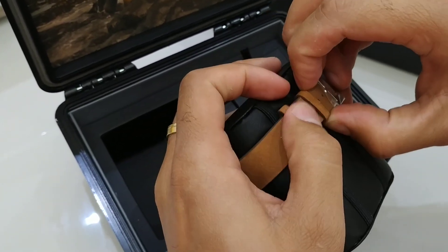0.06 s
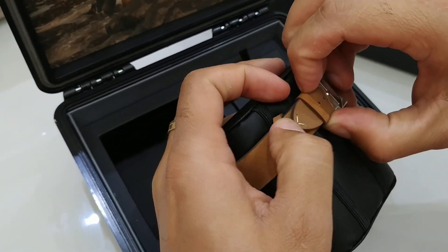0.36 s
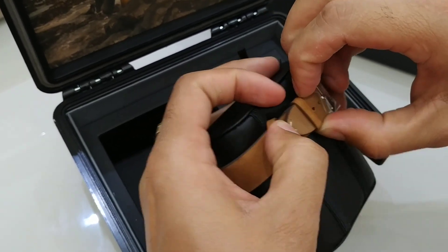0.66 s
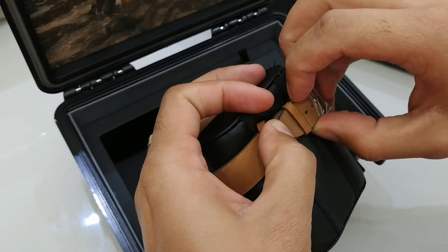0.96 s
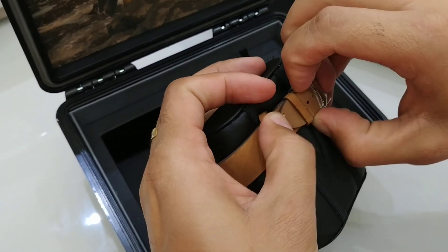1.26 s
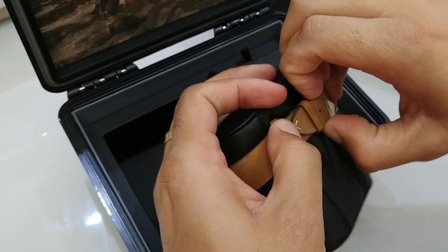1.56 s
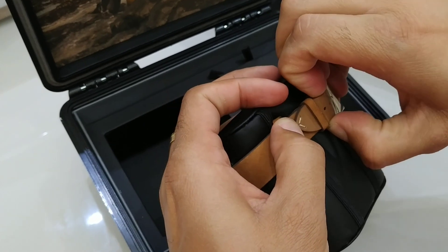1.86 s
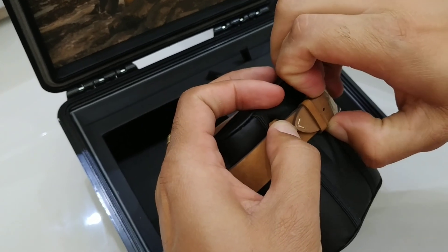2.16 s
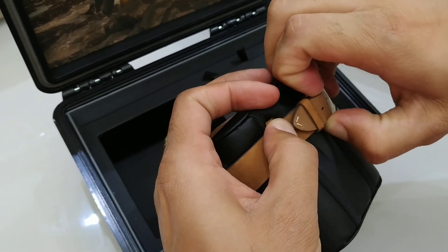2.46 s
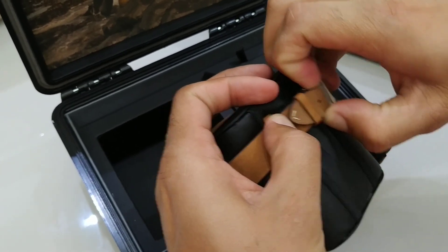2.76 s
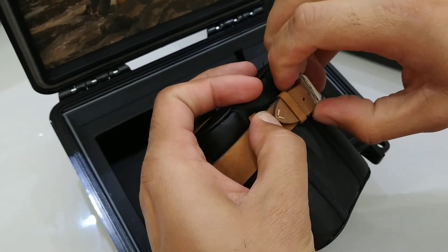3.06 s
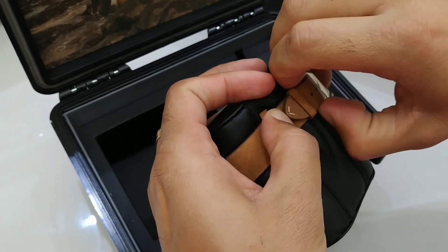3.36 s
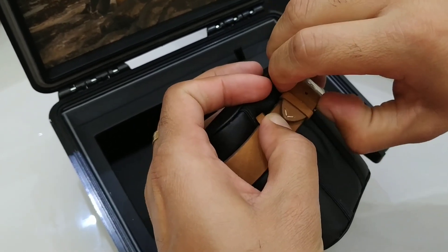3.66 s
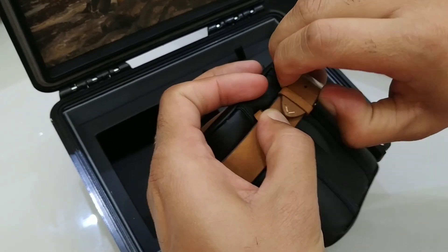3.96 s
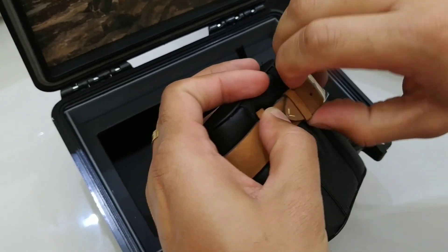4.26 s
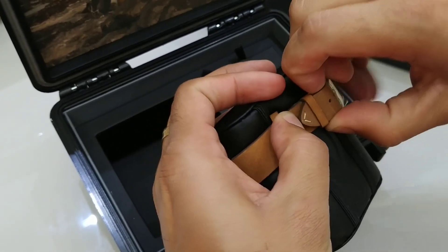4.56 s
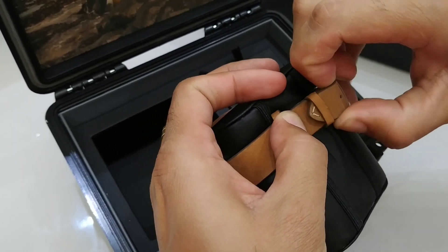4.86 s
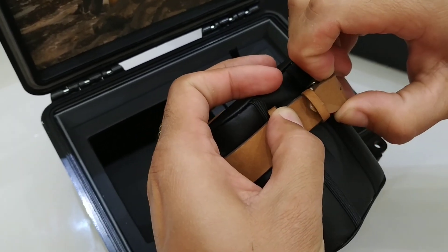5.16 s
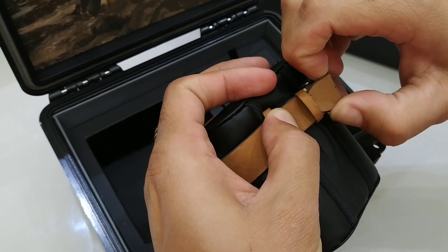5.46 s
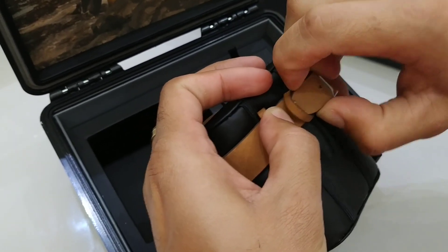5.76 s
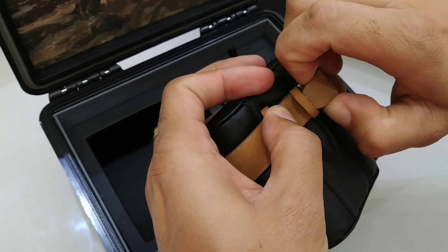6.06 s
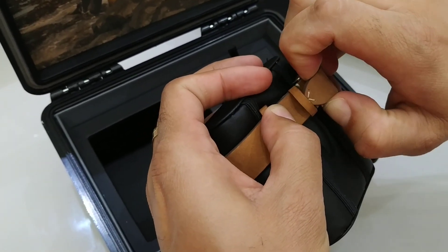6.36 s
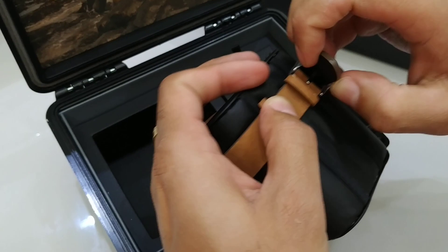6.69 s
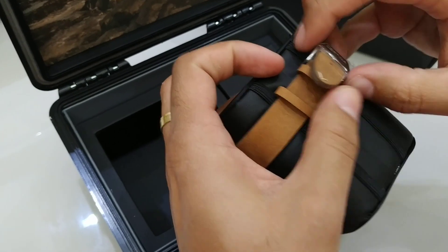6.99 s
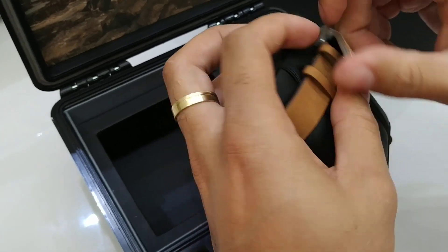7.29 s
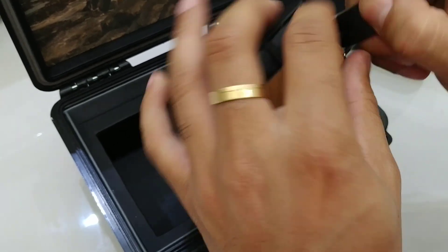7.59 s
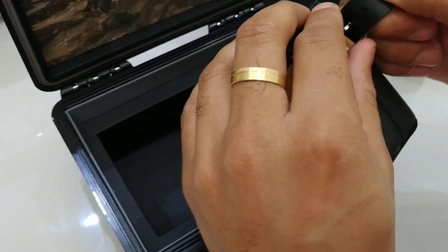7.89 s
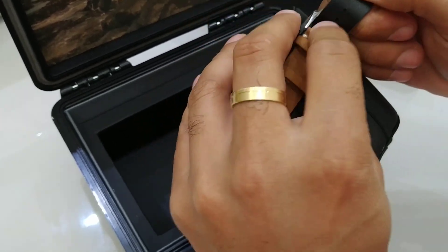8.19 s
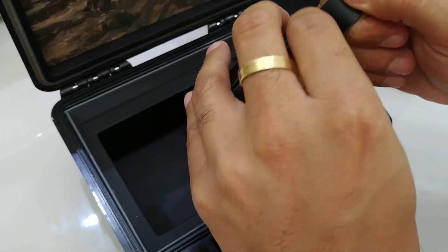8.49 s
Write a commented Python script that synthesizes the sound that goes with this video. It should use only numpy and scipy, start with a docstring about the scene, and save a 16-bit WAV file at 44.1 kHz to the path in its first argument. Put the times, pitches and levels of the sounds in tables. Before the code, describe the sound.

A steel buckle clicks as fingers work a leather watch strap loose, then the watch cushion creaks sharply over a low fan hum.

```python
"""A steel buckle clicks as fingers work a leather watch strap out of it, close by, over an open plastic
case. The watch on its cushion is then pushed about: the cushion sticks and slips, in sharp creaks that
run together into a short zip. Each click, creak or knock is a tiny push that makes a part ring briefly.
Rubbing skin and leather add a rustle made of noise. A fan hums, and the small room echoes a little."""
import sys
import numpy as np
from scipy import signal
from scipy.fft import rfft, irfft, next_fast_len
from scipy.io import wavfile

SR = 44100
rng = np.random.default_rng(int(sys.argv[2]) if len(sys.argv) > 2 else 0)


def log_audio(samples):
    """Write samples as a 16-bit WAV file to the path given in sys.argv[1]."""
    # one column per channel
    frames = np.atleast_2d(samples).T
    # limit to full scale, then quantise
    limited = np.clip(frames, -1, 1)
    pcm = np.round(limited * 32767).astype(np.int16)
    wavfile.write(sys.argv[1], SR, pcm)


N = 376411
TIME = np.arange(N) / SR

# Rumble and hiss of moving air: (frequency [Hz], relative level [dB])
AIR_SPECTRUM = [(8, -3), (18, 4.5), (30, -7.5), (48, -9), (72, -29), (105, -17), (140, -23), (195, -10.5),
                (250, -22), (280, -17.5), (370, -35), (700, -34), (1700, -54), (3000, -50), (5300, -48.5),
                (10000, -51.5), (16000, -48.5)]
# How much the air differs between left and right: (frequency [Hz], gain of the difference [dB])
AIR_WIDTH = [(30, -18.5), (70, -7.5), (200, -18), (400, -20), (1200, 4.5), (8000, 0.5)]
# Tones of the fan motor: (frequency [Hz], relative level [dB])
HUM_TONES = [(118.4, -80.5), (177.6, -63.5), (236.9, -67)]
# The room's echo: (frequency [Hz], gain [dB], fade time [s]). A fade time is how long a 60 dB drop takes.
ROOM_ECHO = [(196, -8.5, 0.26), (553, -2, 0.5), (1100, -10, 0.28), (2190, -3.5, 0.24), (3380, -4, 0.24),
             (5400, -7, 0.35), (10000, -6.5, 0.26), (14500, -3, 0.16)]
# Faint thin whistles and squeaks: (start [s], length [s], pitch [Hz], width [Hz], level [dB])
FAINT_WHISTLES = [(1.796, .08, 1600, 600, -69.5), (2.77, .04, 1450, 450, -62.5),
                  (2.75, 0.37, 2700, 220, -79), (3.171, 0.44, 2720, 130, -76.5),
                  (3.576, 0.043, 1340, 600, -66), (5.047, .19, 2360, 120, -68),
                  (6.568, .15, 2780, 600, -66)]
# Sliding leather: (frequency [Hz], relative level [dB])
LEATHER_SPECTRUM = [(1500, -1.5), (3000, 1), (4200, 3), (5600, 4), (8500, -1), (11000, -5.5), (15000, -8.5),
                    (17000, -9)]
# Brushing skin: (frequency [Hz], relative level [dB])
SKIN_SPECTRUM = [(150, -2.5), (400, 3.5), (800, -4), (1500, -3), (2300, -4), (3200, -12), (6000, -18)]
# Finger movements: (start [s], length [s], leather level [dB], skin level [dB])
FINGER_STROKES = [(0.64, 0.17, -59.5, -71), (0.877, 0.061, -60, -58.5), (1.26, 0.26, -68, -64),
                  (2.781, 0.18, -57, -63.5), (3.99, 0.074, -59.5, -70), (4.316, 0.15, -86, -86),
                  (4.706, 0.081, -59, -78), (5.572, 0.11, -62, -67), (6.504, 0.434, -55, -63),
                  (6.958, 0.34, -61.5, -78), (7.326, 0.25, -51, -61.5), (7.662, 0.073, -55, -58),
                  (7.777, 0.64, -57, -59.5)]
# Hand, strap and cushion knock on the case. The last three levels are relative to the knock:
# (time [s], level [dB], pitch [Hz], lower wall ring [dB], thump [dB], crack [dB])
CASE_KNOCKS = [(0.6914, -37.5, 1950, 0.5, -26, -11), (.936, -36, 1350, -2.5, -6.5, -20),
               (4.9191, -43.5, 1370, 2, -2, 0), (6.4408, -34, 1720, 7, 5, 5),
               (6.703, -40, 2047, -2.5, -34, -18), (7.363, -38.5, 2300, -12.5, -13, 2.5),
               (8.2731, -28, 1550, -23, -20, -4), (8.5074, -48, 1530, -9, 2.5, -1)]
# Low tones of the whole case: (frequency [Hz], relative level [dB], fade time [s])
CASE_TONES = [(191, 8.5, 0.1), (265, 15, 0.041), (342, 10, 0.024)]
# Tones of the buckle and watch steel: (frequency [Hz], relative level [dB], fade time [s])
STEEL_TONES = [(4877, -4, .15), (8237, 0, .17), (8309, -2, .17), (8495, 0, .19), (8738, -3, .15),
               (10160, -3, .18), (9067, -4, .14), (10220, -3, .2), (11420, -5, .19), (12420, -7, .2),
               (12980, -5, .17), (13965, -3, .18), (15220, -6, .19), (15660, -3, .19)]
# The strap jerks through its loop and over the cushion: (time [s], level [dB])
STRAP_JERKS = [(5.9048, -28), (5.9156, -34), (5.931, -33.5), (5.948, -36), (5.985, -38), (6.0114, -42),
               (7.8092, -29.5), (7.8571, -23)]
# Where tight leather rings: (frequency [Hz], width [Hz], relative level [dB])
LEATHER_BANDS = [(5650, 900, -3), (7050, 900, 0), (8500, 1300, 0.5), (13200, 1200, -19), (14900, 1100, -10)]
# Single slips of the cushion: (time [s], level [dB])
CUSHION_SLIPS = [(7.89, -17.5), (7.9335, -18), (7.988, -17), (8.021, -19), (8.262, -19), (8.2704, -17.5)]
# The slips run together: (time [s], rate [slips/s], level [dB])
CUSHION_ZIP = [(8.2741, 244, -19.5), (8.288, 246, -25.5), (8.301, 286, -23.5), (8.312, 470, -31.5),
               (8.326, 540, -30.5), (8.347, 460, -52)]
# Where a slip rings: (frequency [Hz], width [Hz], relative level [dB])
CUSHION_BANDS = [(2300, 700, -18), (4600, 1100, -7), (6000, 1700, -7), (8450, 1400, 3.5), (10100, 900, 0.5),
                 (11400, 1400, -4), (13800, 1500, 3), (15250, 1300, 2)]
# Clicks of the buckle, its tongue and the watch: (time [s], level [dB], snap pitch [Hz],
# hollow over snap [dB], bright edge over snap [dB], left over right [dB], chatter over first push [dB])
BUCKLE_CLICKS = [(0.1557,-43,5570,-4.5,-23,10,-6), (0.6919,-40,5740,-1.5,-7,-1,8),
                 (0.8271,-42.5,6100,-9,-8,8,15), (.841,-43,6000,-9,-4,12,3),
                 (0.8598,-42,5740,-12.5,-5,14,2), (0.894,-36.5,5400,-15,-7,9,7),
                 (0.913,-40,5940,-5,-10,11,4), (0.936,-49,5900,-5,-7,5,-1),
                 (1.0156,-39.5,5070,-12,-9.5,6,-5), (1.782,-50.5,6200,-10,1.5,3,12),
                 (2.282,-62.5,4940,8.5,-18,1,10), (2.4215,-43,5490,-22,-27,8,-14),
                 (2.628,-62,5550,-7,-11,-1,2), (2.769,-57,5900,-8,-8,5,6), (2.8418,-42,6500,-2.5,-3,7,11),
                 (2.8712,-35,6150,-20,-12,4,10), (3.065,-55.5,6000,-23,-13,3,-4.5),
                 (3.146,-57.5,5800,-21,-2,4,0), (3.4084,-46,5260,-15.5,2.5,4,20),
                 (4.0019,-38,5140,-4.5,-5,6,6), (4.101,-51,6700,-23,10,10,0),
                 (4.109,-52,6000,-2.5,-7.5,13,3), (4.327,-59,7500,-22,-1,3,6),
                 (4.3335,-40,7360,-32,-8,3.5,8), (4.398,-56,5750,-23,6.5,2,9),
                 (4.4373,-50.5,5070,-16,-14,11,0), (4.481,-65.5,6000,-18,8,1,2),
                 (4.59,-47,5300,-3.5,-18.5,10,-5), (4.6269,-41,6000,-13.5,-22,3,17),
                 (4.69,-39.5,4840,-22,-21,4,-7), (4.9037,-28.5,5260,-23,2.5,4,4),
                 (5.278,-49.5,4840,-22,-24,9,-5), (5.6601,-44,5200,-11,-14,13,-1),
                 (5.6964,-53,6810,-23,-13,3,2), (6.2391,-47,8000,-21,-9,4,5), (6.44,-27,5650,-8,2,3,12),
                 (6.685,-45.5,6340,-3,-15,9,4), (6.703,-35.5,7260,-8,-5,3,9),
                 (6.8401,-35.5,5000,-11,-13,5,1), (6.847,-33,6460,-7,-25,2,-6),
                 (6.864,-38.5,6650,-16,-5,1,8), (7.0346,-33.5,6570,-14,-13,2,5),
                 (7.047,-36.5,5100,-19,-25,1,-14), (7.0665,-38.5,7100,-25,-12,16.5,-3),
                 (7.0683,-41.5,6700,-18.5,-8,-3,-3), (7.1583,-42,7100,-29,-12,6,0),
                 (7.1958,-53,5460,-20,3,1,3), (7.3081,-47,7900,-25,0,4,5), (7.3198,-30.5,8200,-27,-3.5,4,4),
                 (7.3624,-35,7200,-10.5,4,1,16), (7.427,-49,6370,-6,-12,-5,-8),
                 (7.477,-50.5,4730,-13,-3,8,-2), (7.4894,-41.5,5570,-3,0,-2,18),
                 (7.755,-50.5,6260,-19.5,-13,4,5.5), (8.379,-45,8030,-9,-10,5,3),
                 (8.506,-19.5,7150,-37,-6,7.5,-9)]


def gain(db):
    """Turn decibels into a number to multiply by."""
    return 10 ** (np.asarray(db) / 20)


def unit(x):
    """Scale a sound so its average strength (rms) is 1."""
    return x / np.sqrt(np.mean(x ** 2))


def unit_hit(x):
    """Scale a short sound so its first 4 ms have an average strength of 1."""
    return x / np.sqrt(np.mean(x[..., :176] ** 2))


def add(track, start, x):
    """Mix a short sound into the track at a start time in seconds."""
    i = int(start * SR)
    track[:, i:i + x.shape[-1]] += x[..., :max(N - i, 0)]


def place(pan_db, room_db):
    """Gains for three rows: left, right and the feed to the room. Positive pan is to the left."""
    return gain(np.array([[pan_db / 2], [-pan_db / 2], [room_db]]))


def band(x, hz, width_hz, order=1):
    """Keep the frequencies around hz, as a ringing part does."""
    low = np.hypot(hz, width_hz / 2) - width_hz / 2
    high = min(low + width_hz, SR / 2 - 100)
    return signal.lfilter(*signal.butter(order, [low, high], "band", fs=SR), x)


def colour(x, spectrum):
    """Make each frequency louder or softer, following a spectrum table."""
    hz, db = np.transpose(spectrum)
    size = next_fast_len(N)
    log_hz = np.log(np.fft.rfftfreq(size, 1 / SR) + 1)
    curve = gain(np.interp(log_hz, np.log(hz), db))
    return irfft(rfft(x, size) * curve, size)[..., :N]


def ring(tones, t):
    """The fading pure tones of something struck."""
    return sum(gain(db) * np.sin(2 * np.pi * hz * t) * gain(-60 * t / fade_s)
               for hz, db, fade_s in tones)


def resonate(force, bands, tilt_db):
    """A push rings several bands, every other one flipped; tilt_db is the boost per octave."""
    return unit_hit(sum(
        (-1) ** k * gain(db) * (hz / 1000) ** (tilt_db / 6) * band(force, hz, width, order=2)
        for k, (hz, width, db) in enumerate(bands)))


def wander(per_s):
    """A random curve, roughly 1 in size, that heads for a new value per_s times a second."""
    return np.interp(TIME * per_s, np.arange(2048), rng.standard_normal(2048))


def stereo_noise(length, apart):
    """Left and right noise: alike when apart is 0, unrelated when it is 1."""
    noise = rng.standard_normal((3, length))
    return np.sqrt(1 - apart) * noise[0] + np.sqrt(apart) * noise[1:]


def contact(chatter_db, fade_s, apart):
    """One sharp push. Left and right also get brief chatter inside the case; the room feed does not."""
    t = TIME[:1024]
    force = stereo_noise(len(t), apart) * gain(-60 * t / fade_s)
    force *= gain(chatter_db) / np.sqrt(np.sum(force ** 2, axis=1, keepdims=True))
    force[:, 0] += 1
    clean_push = (t == 0) * np.hypot(1, gain(chatter_db))
    return np.vstack([force, clean_push])


def stroke(start, length, rise_s=0.028, fall_s=0.049):
    """A strength curve that rises, holds and dies away."""
    rise = np.clip((TIME - start) / rise_s, 0, 1)
    return rise * np.exp(-np.clip((TIME - start - length) / fall_s, 0, 30))


def around_clicks(spread_s):
    """A curve that swells before each buckle click and fades after it."""
    return sum(np.exp(-np.minimum(np.abs(TIME - start) / spread_s, 20)) for start, *_ in BUCKLE_CLICKS)


def fan():
    """Rumbling air and a wavering motor hum; the bass is alike on both sides, the hiss is not."""
    middle, side = colour(rng.standard_normal((2, N)), AIR_SPECTRUM)
    side = colour(side, AIR_WIDTH)
    air = np.array([middle + side, middle - side]) / np.std(middle)
    hum = 0
    for hz, db in HUM_TONES:
        strength = gain(db + 0.81 * wander(7.4))
        hum += strength * unit(np.sin(2 * np.pi * hz * TIME + .5 * wander(2.12)))
    return (gain(-49) * air + gain(-0.5) * hum) * gain([[-.4], [.4]])


def room(x, build_s=0.00057):
    """The walls blur a sound into a short echo that builds fast and lasts longest in the low middle."""
    t = TIME[:SR // 2]
    hz, db, fade_times = np.transpose(ROOM_ECHO)
    noise = rfft(rng.standard_normal((2, len(t))))
    log_hz = np.log(np.fft.rfftfreq(len(t), 1 / SR) + 1)
    echo = 0
    for one_band, strength, fade_s in zip(np.eye(len(hz)), gain(db), fade_times):
        shape = gain(-60 * t / fade_s) * (1 - np.exp(-t / build_s))
        band_noise = irfft(noise * np.interp(log_hz, np.log(hz), one_band), len(t))
        echo += strength * band_noise * shape / np.sqrt(np.sum(shape ** 2))
    return signal.oaconvolve(x, echo, axes=1)[:, :N]


def faint_whistles():
    """Faint thin whistles and squeaks, each wavering noise in one narrow band."""
    noise = stereo_noise(N, apart=.4) * gain(2 * wander(25))
    return sum(gain(db) * unit(band(noise, hz, width, order=2)) * stroke(start, length)
               for start, length, hz, width, db in FAINT_WHISTLES)


def rubbing():
    """How strongly leather and skin are rubbed: a light, steady grip plus the finger strokes."""
    power = gain([[-68.5], [-66.5]]) ** 2  # the grip on leather, on skin
    for start, length, *levels in FINGER_STROKES:
        power = power + (gain(levels)[:, None] * stroke(start, length)) ** 2
    return np.sqrt(power)


def friction(spectrum, catches_per_s, grain_db, smooth, flutter_db=1.6):
    """A sliding surface catches in countless tiny grains, over a smooth hiss."""
    sizes = gain(grain_db * np.minimum(rng.exponential(size=N), 5))
    catches = (rng.random(N) < catches_per_s / SR) * sizes ** 2
    power = signal.lfilter([1], [1, -np.exp(-1 / (0.0035 * SR))], catches)  # each catch dies away
    grains = np.sqrt(power / power.mean() + smooth) * stereo_noise(N, apart=0.94)
    return unit(colour(grains, spectrum) * gain(flutter_db * wander(35)))


def rustle(leather_gain, skin_gain):
    """Leather hisses through the buckle, harder at each click; skin brushes the cushion and case."""
    leather = friction(LEATHER_SPECTRUM, catches_per_s=700, grain_db=3.8, smooth=.35)
    skin = friction(SKIN_SPECTRUM, catches_per_s=800, grain_db=3, smooth=1)
    surge = 1 + gain(1) * around_clicks(spread_s=0.004)
    return leather * leather_gain * surge + skin * skin_gain


def loose_ticks(effort, base_per_s=4, extra_per_s=80):
    """The loose buckle ticks faintly at random, more often with hard rubbing and near each click."""
    out = np.zeros((2, N))
    rate = np.sqrt(effort / effort.max()) * (base_per_s + extra_per_s * around_clicks(spread_s=0.019))
    moments = np.flatnonzero(rng.random(N) < rate / SR)
    for i, (louder, higher) in zip(moments, rng.standard_normal((len(moments), 2))):
        force = contact(chatter_db=3, fade_s=.011, apart=.6)
        tick = click(force, hz=6000 * np.exp(0.29 * higher), hollow_db=-8.5, edge_db=-22, pan_db=6.5)
        add(out, i / SR, gain(-62 + 1.5 * louder) * tick[:2])
    return out


def case_knocks():
    """A soft knock rings the plastic wall in two bands, with a small crack and a thump of the box."""
    out = np.zeros((3, N))
    thump = unit_hit(ring(CASE_TONES, TIME[:SR // 8]))
    for start, db, hz, lower_db, thump_db, crack_db in CASE_KNOCKS:
        force = contact(chatter_db=-1, fade_s=.014, apart=.9)
        upper, lower = (unit_hit(band(force, f, f * .48, order=2)) for f in (hz, hz * 0.625))
        crack = unit_hit(band(force, hz=3900, width_hz=1500, order=2))
        wall = upper + gain(lower_db) * lower + gain(crack_db) * crack
        add(out, start, gain(db) * wall * place(pan_db=-3, room_db=-1.5))
        add(out, start, gain(db + thump_db) * thump)
    return out


def steel_ring(shocks):
    """The steel parts ring on after each shock."""
    tones = ring(STEEL_TONES, TIME[:SR // 3])
    return signal.oaconvolve(shocks, tones[None] / np.sqrt(np.sum(tones ** 2)))[:, :N]


def strap_jerks():
    """Tight leather lets go in dry jerks that all ring the same bands, over a small crack."""
    out = np.zeros((3, N))
    for start, db in STRAP_JERKS:
        force = contact(chatter_db=-1, fade_s=.016, apart=.5)
        crack = gain(-7) * unit_hit(band(force, hz=7400, width_hz=12000, order=2))
        hollow = gain(-22) * unit_hit(band(force, hz=1450, width_hz=850))
        add(out, start, gain(db) * (resonate(force, LEATHER_BANDS, tilt_db=0) + crack + hollow))
    return out * place(pan_db=.5, room_db=-4)


def slip(tilt_db):
    """The cushion lets go at one spot: a crack, the same bands each time, and faintly the case."""
    force = contact(chatter_db=-1, fade_s=.012, apart=.5)
    crack_force = contact(chatter_db=-3, fade_s=.012, apart=.5)
    crack = gain(-8) * unit_hit(band(crack_force, hz=9500, width_hz=11500, order=2))
    case = gain(-27) * unit_hit(band(force, hz=1400, width_hz=2500))
    return unit_hit(resonate(force, CUSHION_BANDS, tilt_db) + crack + case)


def cushion_creak(scatter_db=1.8, jitter=.14):
    """The cushion sticks and slips: single cracks, then an uneven zip that is duller and fades."""
    singles, run = np.zeros((2, 3, N))
    for start, db in CUSHION_SLIPS:
        add(singles, start, gain(db) * slip(tilt_db=0.5))
    times, rates, levels = np.transpose(CUSHION_ZIP)
    start = times[0]
    for later, louder in rng.standard_normal((60, 2)):
        if start < times[-1]:
            db = np.interp(start, times, levels) + scatter_db * louder
            add(run, start, gain(db) * slip(tilt_db=-0.5))
            start += np.exp(jitter * later) / np.interp(start, times, rates)
    # The spot lies to the right, and the hand shields it from the room.
    out = singles * place(pan_db=-1, room_db=-6.5) + run * place(pan_db=-1, room_db=-3.5)
    out[0] = np.roll(out[0], 1)  # the left side hears it one sample later
    return out


def click(force, hz, hollow_db, edge_db, pan_db):
    """One click: the steel's faintly pitched snap, a bright edge and the hollow sound of the case."""
    ping = unit_hit(band(force, hz, hz * .25, order=2)) * place(pan_db=0, room_db=-15)
    snap = unit_hit(band(force, hz, hz * .7)) + gain(-8) * ping
    snap = unit_hit(band(snap, hz=6450, width_hz=6000, order=4))
    edge = gain(edge_db) * unit_hit(band(force, hz=13300, width_hz=4400, order=2))
    hollow = gain(hollow_db) * unit_hit(band(force, hz=1450, width_hz=1250, order=2))
    return (snap + edge) * place(pan_db, room_db=-3) + hollow * place(pan_db=-0.5, room_db=-2)


def buckle():
    """The buckle's tongue, its frame and the watch click on contact; no two clicks are alike."""
    out = np.zeros((3, N))
    for start, db, hz, hollow_db, edge_db, pan_db, chatter_db in BUCKLE_CLICKS:
        force = contact(chatter_db, fade_s=.013, apart=.6)
        add(out, start, gain(db) * click(force, hz, hollow_db, edge_db, pan_db))
    return out


def scene():
    """Mix the soft sounds with the sharp ones and their echo."""
    leather_gain, skin_gain = rubbing()
    soft = fan() + rustle(leather_gain, skin_gain) + faint_whistles()
    clicks, creak = buckle(), cushion_creak()
    steel = steel_ring(gain(-32) * clicks + gain(-31) * creak)
    sharp = clicks + creak + steel + strap_jerks() + case_knocks()
    direct, room_feed = sharp[:2], sharp[2:]
    return direct + room(room_feed) + soft + loose_ticks(leather_gain)


def record(dry):
    """Cut away the treble above 16000 Hz."""
    return signal.sosfilt(signal.ellip(8, .2, 60, 16000, fs=SR, output="sos"), dry)


dry = scene()
out = record(dry)
log_audio(out)
```